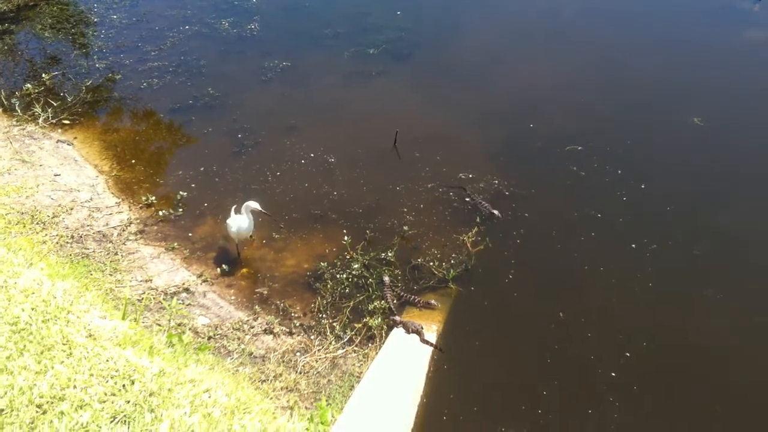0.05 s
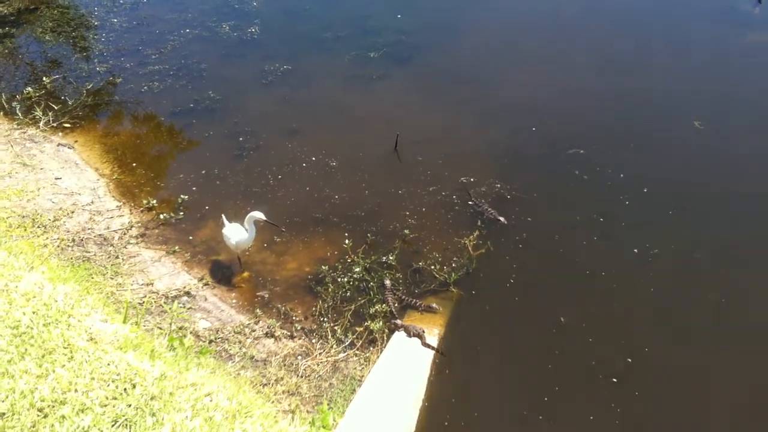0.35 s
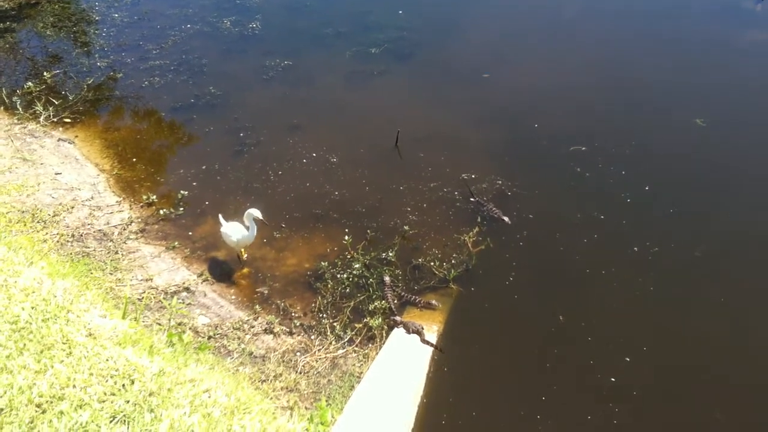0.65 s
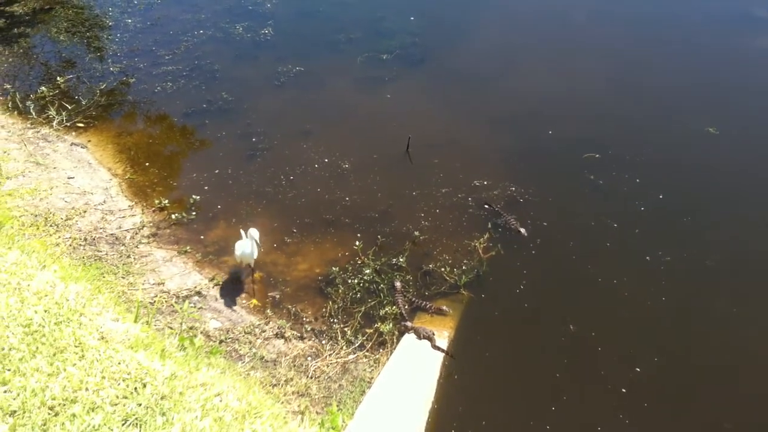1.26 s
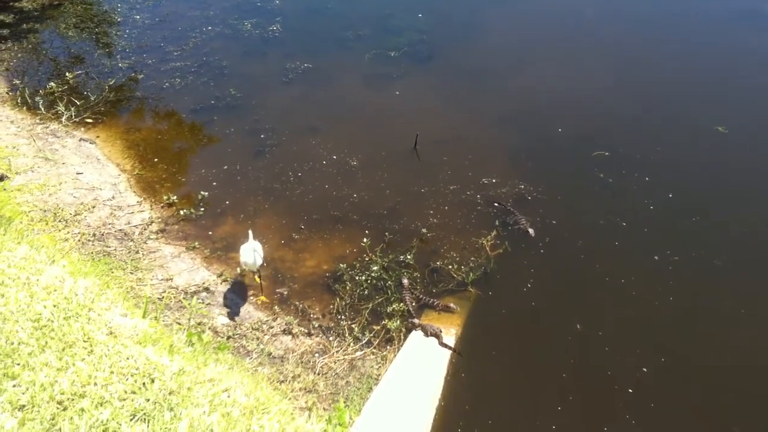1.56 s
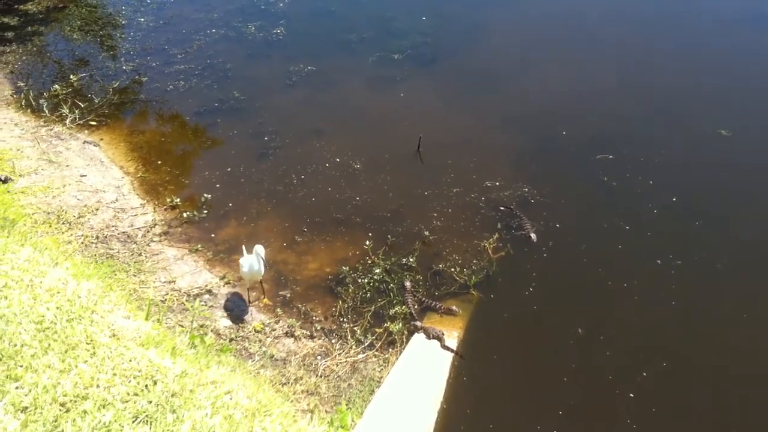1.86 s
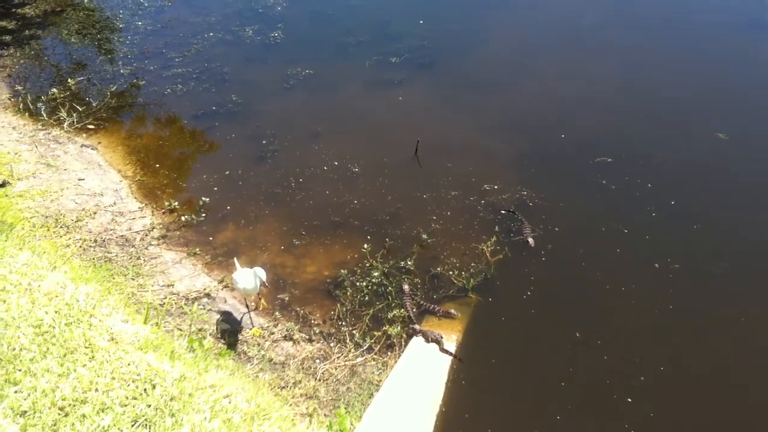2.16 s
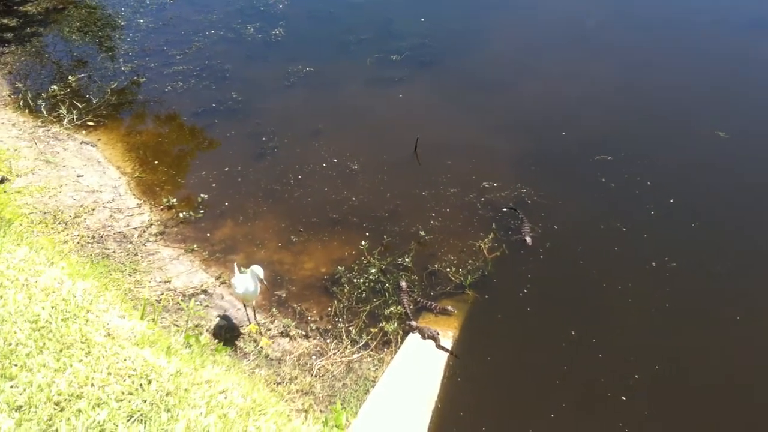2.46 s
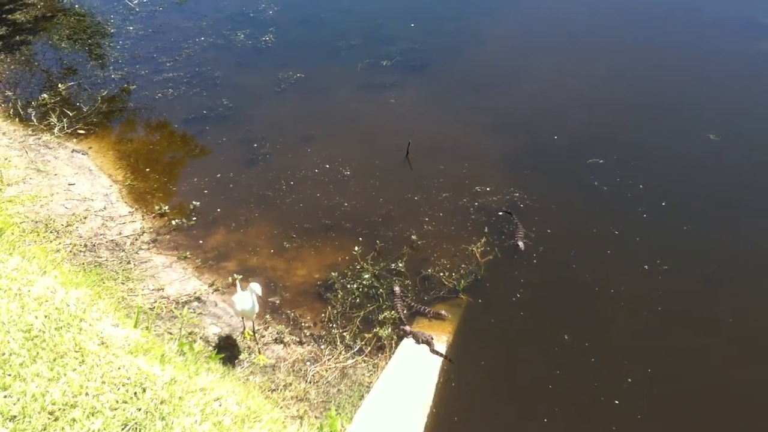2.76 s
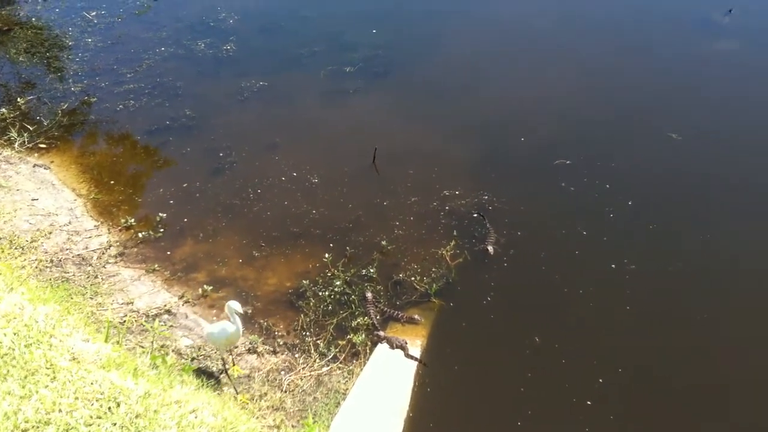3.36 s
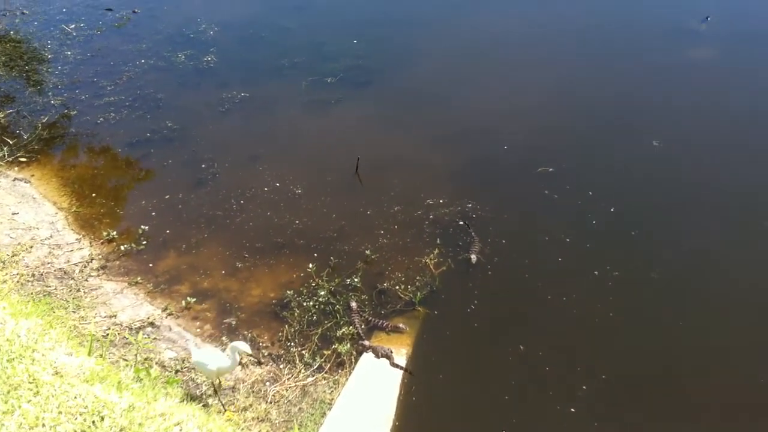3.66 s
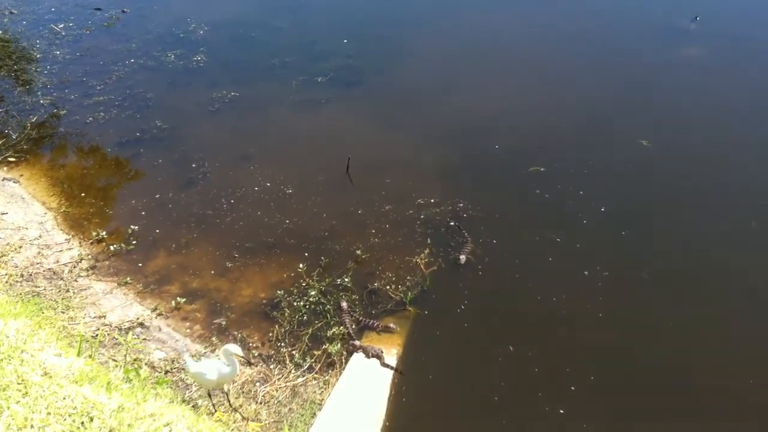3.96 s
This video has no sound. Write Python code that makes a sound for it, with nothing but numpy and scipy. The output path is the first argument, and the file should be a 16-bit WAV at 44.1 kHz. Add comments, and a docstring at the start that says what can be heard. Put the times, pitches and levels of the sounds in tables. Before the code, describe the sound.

A water bird gives nine harsh, rasping croaks in quick succession over quiet outdoor air.

```python
"""Water bird croaking at a pond's edge.

A lone click, then nine harsh croaks in quick succession. Each is a train of clicks, mostly slowing,
that ring the bird's windpipe and throat and scatter off the bank. Fingers knock and rub on the
hand-held recorder; a small bird sings far off over quiet outdoor air."""
import sys
import numpy as np
from scipy import signal
from scipy.fft import rfft, irfft
from scipy.io import wavfile

SR = 44100
rng = np.random.default_rng(int(sys.argv[2]) if len(sys.argv) > 2 else 0)


def pcm_store(signal):
    """Save signal as 16-bit PCM."""
    levels = np.round(np.clip(np.atleast_2d(signal), -1, 1) * 32767)
    wavfile.write(sys.argv[1], SR, levels.astype(np.int16).T)


N = 176400
T = np.arange(N) / SR


def undb(db):
    """Decibels to gain."""
    return 10 ** (np.asarray(db) / 20)


def curve(points, hz):
    """Level in dB at hz, interpolated over log frequency."""
    points_hz, db = np.array(points).T
    return np.interp(np.log(hz + 1), np.log(points_hz), db)


def noise(points):
    """Coloured noise, unit rms."""
    hz = np.arange(N // 2 + 1) * SR / N
    x = irfft(rfft(rng.standard_normal(N)) * undb(curve(points, hz)), N)
    return x / x.std()


def minimum_phase(db):
    """Causal impulse response of a dB spectrum."""
    cepstrum = irfft(db * np.log(10) / 20)
    half = len(cepstrum) // 2
    cepstrum[1:half] *= 2
    cepstrum[half + 1:] = 0
    return irfft(np.exp(rfft(cepstrum)))


def add(out, at_s, x):
    """Mix x into out at at_s."""
    i = max(int(at_s * SR), 0)
    out[i:i + len(x)] += x[:max(len(out) - i, 0)]


def burst(decay_s, size=12000):
    """Decaying whitened noise, unit energy."""
    fade = np.exp(-T[:size] / decay_s)
    spectrum = rfft(rng.standard_normal(size) * fade)
    x = irfft(spectrum / (np.abs(spectrum) + 1e-12), size) * np.minimum(8 * fade, 1)
    return x / np.linalg.norm(x)


def swell(middle_s, length_s):
    """Half-cosine rise and fall."""
    return np.cos(np.pi * np.clip((T - middle_s) / length_s, -.5, .5))


def air():
    """Quiet outdoor hiss and a far rushing that ebbs away."""
    # spectra: freq_hz, level_db
    hiss = [(25, -21), (50, -17), (90, -6), (160, 2.5), (300, -6.5), (500, -10), (1000, -10.5), (2000, -17),
            (4000, -20), (8000, -21), (10500, -26.5), (15500, -27)]
    rushing = [(300, -29), (700, -10), (1050, 4), (1300, -6), (1580, 1), (2100, -22), (5000, -57)]
    return undb(-61) * noise(hiss) + undb(-67.5) * noise(rushing) * swell(middle_s=.43, length_s=2.6)


def songbird():
    """Four faint rising whistles a phrase, blurred by distance."""
    # phrases: start_s
    phrases = [1.126, 1.388, 1.654, 1.917, 2.173]
    # whistles in a phrase: offset_s, length_s, pitch_hz, rise_share, level_db
    notes = [(0, 0.043, 2380, 0.06, -71), (0.039, 0.041, 2874, 0.134, -65.5),
             (0.126, .04, 3310, .03, -65.5), (.17, 0.039, 3920, 0.07, -69)]
    out = np.zeros(N)
    for start_s in phrases:
        for offset_s, length_s, pitch_hz, rise, db in notes:
            progress = np.arange(int(length_s * SR)) / (length_s * SR)
            detune = .0073 * rng.standard_normal()
            flutter = .07 * rng.standard_normal(len(progress))
            hz = pitch_hz * (1 + rise * (progress - .5) + detune + flutter)
            whistle = np.sin(2 * np.pi * np.cumsum(hz) / SR)
            add(out, start_s + offset_s, undb(db) * np.sin(np.pi * progress) * whistle)
    return undb(-.5) * out + signal.fftconvolve(out, burst(decay_s=.04))[:N]


def finger_knocks():
    """Soft knocks ring the modes of the recorder's case."""
    # case modes: freq_hz, width_hz, level_db
    modes = [(112, 20, -18), (154.6, 36, -2.5), (274.4, 180, 0), (450, 46, -11), (990, 296, -9)]
    # knocks: start_s, level_db, cutoff_hz
    knocks = [(.010, -10, 395), (.178, -18.5, 240), (0.663, -21.5, 213), (1.337, -18.5, 145),
              (1.585, -14, 215), (1.626, -19, 267), (1.933, -26, 210), (2.246, 1, 650), (2.253, -5.5, 540),
              (2.275, -6, 206), (2.405, -5, 310), (2.442, -12, 260), (2.513, -11, 175), (2.593, -8.5, 410),
              (2.613, -9, 327), (2.643, -11.5, 520), (2.664, -14, 228), (2.845, -8.5, 224),
              (2.961, -11, 302)]
    out, t = np.zeros(N), T[:SR // 10]
    body = sum(undb(db) * width_hz * np.exp(-np.pi * width_hz * t) * np.cos(2 * np.pi * hz * t)
               for hz, width_hz, db in modes)
    body = signal.sosfilt(signal.butter(4, 95, "high", fs=SR, output="sos"), body)
    body /= np.abs(body).max()
    for start_s, db, cutoff_hz in knocks:
        softness = signal.butter(3, cutoff_hz, fs=SR, output="sos")
        add(out, start_s, undb(db) * signal.sosfilt(softness, body))
    return undb(-4) * out


def finger_rubs():
    """Fingers slide on the case: brief swells of low noise."""
    # friction spectrum: freq_hz, level_db
    friction = [(35, -38), (65, -23.5), (110, -6), (190, 4.5), (300, -11.5), (500, -18), (800, -23),
                (2000, -63.5)]
    # rubs: middle_s, length_s, level_db
    rubs = [(.008, 0.046, -36), (0.172, 0.066, -47), (1.533, 0.066, -53.5), (1.622, 0.15, -56),
            (1.729, 0.13, -57.5), (2.233, 0.16, -45.5), (2.411, 0.086, -32.5), (2.614, 0.08, -33.5),
            (2.693, 0.087, -34), (2.825, 0.047, -42.5), (2.966, 0.033, -34), (3.13, 0.23, -55.5),
            (3.787, 0.055, -55.5)]
    envelope = sum(undb(db) * swell(middle_s, length_s) for middle_s, length_s, db in rubs)
    return undb(-.5) * noise(friction) * envelope


def click(age_s, ring_hz, opening, echo_ms, accent, treble_db):
    """One snap of the voice, echoed in the windpipe, shaped by throat and beak; air rasps on top."""
    # spectra, beak nearly shut and open: freq_hz, level_db
    shut_beak = [(100, -32), (400, 1.5), (700, -4), (1400, -8.5), (1950, 1), (2350, -8), (2850, -13.5),
                 (3350, 0), (3750, -3.5), (4200, -32), (5300, -23), (6550, -17.5), (7600, -19.5),
                 (9500, -27.5), (15000, -43)]
    open_beak = [(100, -33.5), (330, -7), (560, -1.5), (1000, -3.5), (1500, 1), (2000, 2), (2450, -7),
                 (3000, -0.5), (3250, -11), (3600, -29), (3900, -19), (4200, -9.5), (4600, -15.5),
                 (5400, -18), (6100, -26.5), (6900, -32.5), (7600, -22.5), (9000, -28), (10500, -40.5),
                 (15000, -54)]
    # bands stressed at a croak's onset: centre_hz, width_hz, gain_db
    bite = [(1510, 310, 5.5), (4100, 280, 14), (5300, 230, 8)]
    size, ring_width_hz, smear_s, rasp_hz = 2048, 120, .0026, 4850
    hz = np.fft.rfftfreq(size, 1 / SR)
    tension = np.exp(-age_s / .065) - np.exp(-1)  # resonances start high and sag
    centre_hz = ring_hz * (1 + .09 * tension)
    scaled_hz = hz / (1 + .05 * tension)

    ring_gain = undb(4 + 7 * (1 - opening))  # stronger behind a shut beak
    throat_db = 10 * np.log10(1 + ring_gain ** 2 / (1 + (2 * (hz - centre_hz) / ring_width_hz) ** 2))
    beak_db = (1 - opening) * curve(shut_beak, scaled_hz) + opening * curve(open_beak, scaled_hz)
    shelf_db = treble_db * np.tanh((hz / 5900) ** 4)
    bite_db = accent * sum(db * np.exp(-((hz - band_hz) / width_hz) ** 2)
                           for band_hz, width_hz, db in bite)
    uneven_db = 1.3 * np.interp(hz, np.linspace(0, SR / 2, 40), rng.standard_normal(40))
    tract = minimum_phase(throat_db + beak_db + shelf_db + bite_db + uneven_db)

    delay_s = smear_s * np.tanh(hz / 2640) ** 2  # treble trails bass
    snap = np.exp(-2j * np.pi * np.cumsum(delay_s) * hz[1])
    rasp = rfft(burst(decay_s=.0043, size=size))
    rasp_gain = undb(-14.5) + (hz / rasp_hz) ** 3
    source = (snap + rasp_gain * rasp) / np.hypot(1, rasp_gain)
    windpipe = 1 / (1 - undb(-9.5) * np.exp(-2j * np.pi * scaled_hz * echo_ms / 1000))
    return irfft(rfft(tract) * source * windpipe)


def water_bird():
    """Click trains, brighter through the series; the bank scatters each anew as the bird walks."""
    # croaks: start_s, length_s, first_rate_hz, last_rate_hz, level_db, ring_hz, opening_share, echo_ms
    croaks = [(2.305, 0.0046, 92, 93, -12, 1670, 0.36, 1.55),
              (2.3446, 0.18, 91.86, 94.4, 0.4, 1770, 0.23, 1.564),
              (2.5617, 0.13, 99.44, 89.6, 0, 1965, 0.67, 1.67),
              (2.733, 0.14, 98.6, 93.2, -1, 1814, 0.98, 1.58),
              (2.909, 0.16, 98.2, 92.05, -1.5, 1830, 0.96, 1.55),
              (3.1054, .161, 100.5, 92, -1.5, 1860, 1, 1.61),
              (3.3067, .154, 99.45, 90.36, -1, 1880, 0.99, 1.627),
              (3.499, .162, 100.7, 87.9, -1, 1760, 0.96, 1.61),
              (3.7116, 0.15, 97.5, 86.44, -0.85, 1780, 0.85, 1.64),
              (3.9061, 0.11, 91.9, 77.8, -2.5, 1720, 0.75, 1.74)]
    jitter_s, spread_db, accent_db, accent_s = .00006, .35, 1.5, .026
    treble_db_per_s, neutral_at_s = 4.5, 2.909
    out = np.zeros(N)
    for start_s, length_s, first_hz, last_hz, db, ring_hz, opening, echo_ms in croaks:
        call, age_s = np.zeros(SR // 2), 0.
        treble_db = treble_db_per_s * (start_s - neutral_at_s)
        for late, loud in rng.standard_normal((22, 2)):
            accent = opening * np.exp(-age_s / accent_s)  # an open beak starts harder
            pulse = click(age_s, ring_hz, opening, echo_ms, accent, treble_db)
            if age_s < length_s:
                gain = undb(db + accent_db * accent + spread_db * loud)
                add(call, age_s + jitter_s * late, gain * pulse)
            age_s += 1 / np.interp(age_s, [0, length_s], [first_hz, last_hz])
        near_scatter = undb(-5) * burst(decay_s=.0095)
        far_scatter = undb(-16.5) * burst(decay_s=.044)
        add(out, start_s, call)
        add(out, start_s + .003, signal.fftconvolve(call, near_scatter + far_scatter))
    return undb(-6.5) * out


def scene():
    """Mono mix at one microphone."""
    return (water_bird() + finger_knocks() + finger_rubs() + songbird() + air())[None]


def record(dry):
    """Steep low-pass in the recorder."""
    cutoff_hz = 15830
    return signal.sosfilt(signal.ellip(10, .1, 60, cutoff_hz, fs=SR, output="sos"), dry)


dry = scene()
out = record(dry)
pcm_store(out)
```